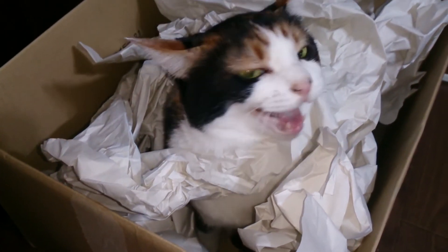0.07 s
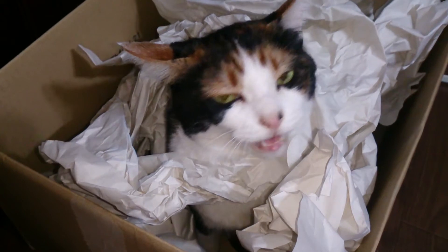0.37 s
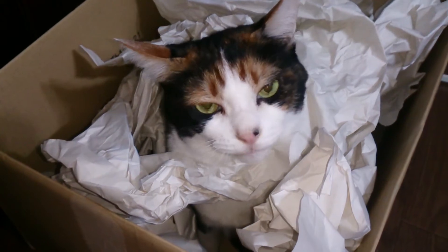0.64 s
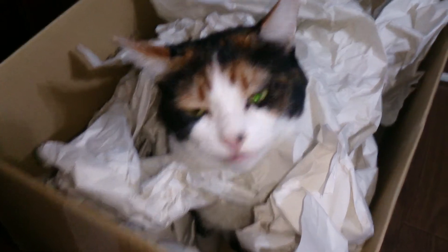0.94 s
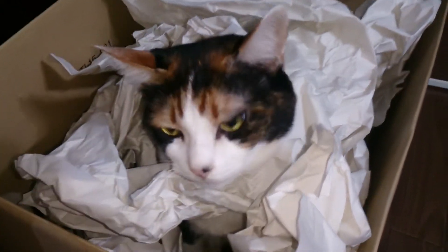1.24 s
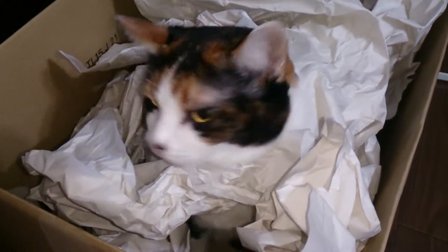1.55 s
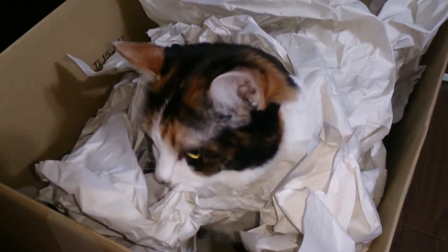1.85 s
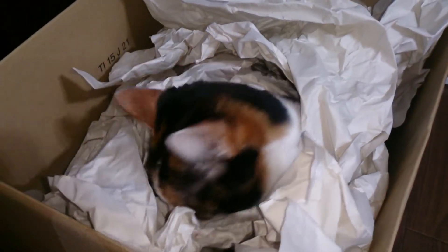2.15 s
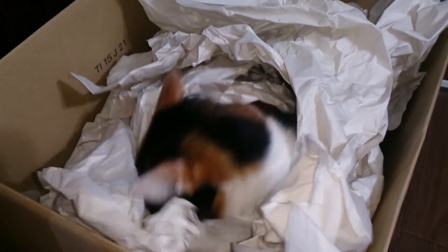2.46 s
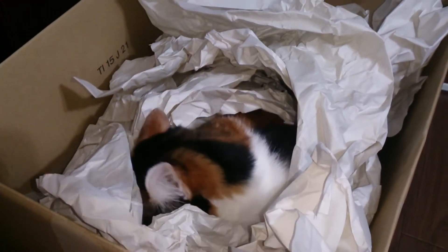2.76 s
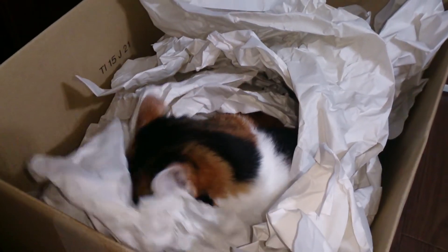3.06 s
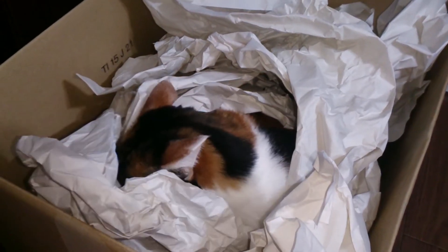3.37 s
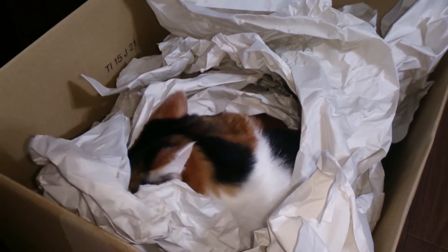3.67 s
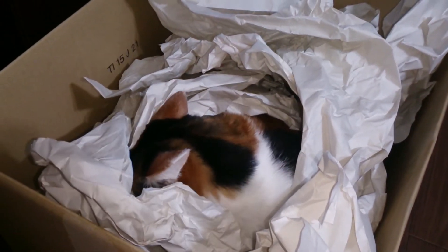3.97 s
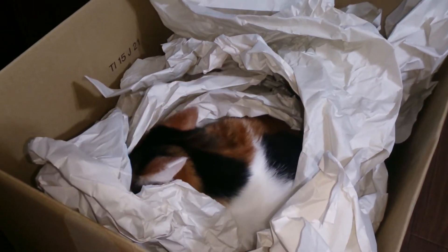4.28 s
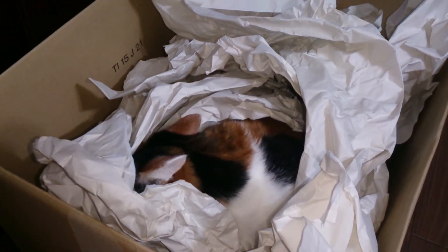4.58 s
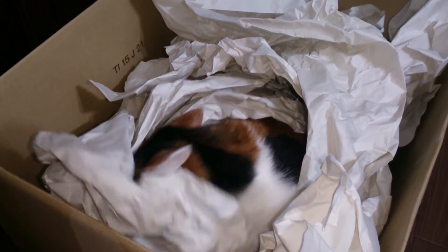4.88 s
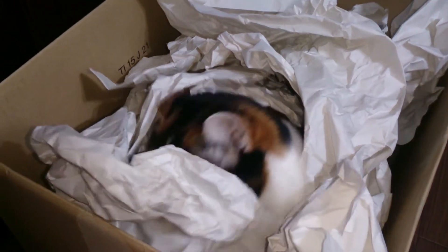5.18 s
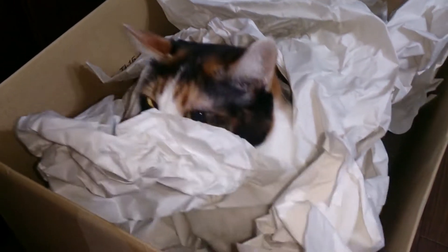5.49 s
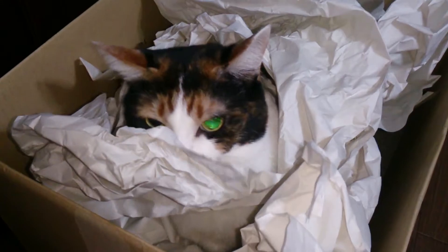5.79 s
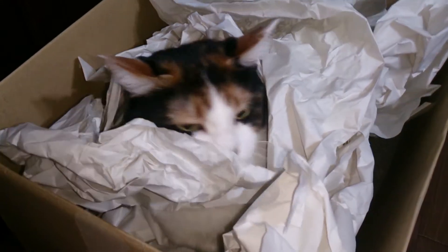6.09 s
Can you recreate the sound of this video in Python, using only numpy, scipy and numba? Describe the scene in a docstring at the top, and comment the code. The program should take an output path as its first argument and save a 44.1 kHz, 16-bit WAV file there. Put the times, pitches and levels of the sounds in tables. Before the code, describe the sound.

One short meow with a creaky ending, followed by bursts of paper crinkling and snapping as a cat burrows in a box.

```python
"""A single meow, ending in a creak, comes from a cardboard box: a cat's vocal folds pulse through the
resonances of its throat and mouth. The cat burrows in crumpled packing paper and comes up again. Each
shove makes the paper slide and buckle in a swarm of tiny cracks that scatter round the box and a small
room; single folds sing as fur drags over them, or snap, and the cat's weight knocks the walls.
A low hum comes in spurts in the left microphone of a hand-held camera, which is bumped and trembles."""
import sys
import numpy as np
from scipy import signal
from scipy.fft import rfft, irfft, next_fast_len
from scipy.io import wavfile
from scipy.ndimage import uniform_filter1d
from numba import njit

SR = 44100
rng = np.random.default_rng(int(sys.argv[2]) if len(sys.argv) > 2 else 0)


def dump_mix(stems):
    """Bounce the given channels to the path in sys.argv[1] as a 16-bit WAV at rate SR."""
    frames = np.atleast_2d(stems).T  # one column per channel
    limited = np.clip(frames, -1, 1)  # hard clip at full scale
    pcm = np.round(limited * 32767).astype(np.int16)
    wavfile.write(sys.argv[1], SR, pcm)


N = 275625
TIME = np.arange(N) / SR


def undb(db):
    """The decibel scale: 20 dB is a factor of ten in amplitude."""
    return 10 ** (np.asarray(db) / 20)


def unit(x):
    """Normalisation to an rms of 1."""
    return x / np.sqrt(np.mean(x ** 2))


def curves(table):
    """Linear interpolation of a table's columns over time."""
    times, *columns = np.transpose(table)
    return [np.interp(TIME, times, column) for column in columns]


def walk(rate_hz):
    """Smoothed Gaussian noise: a slow random fluctuation of rms 1."""
    hold = int(SR / rate_hz)
    steps = np.repeat(rng.standard_normal(N // hold + 1), hold)
    return unit(uniform_filter1d(steps, hold)[:N])


def add(track, start_s, sound):
    """Superposition: a sound adds to the track from its starting time."""
    start = int(start_s * SR)
    part = sound[..., :N - start]
    track[..., start:start + part.shape[-1]] += part


def colour(x, points):
    """Minimum-phase filtering by a response of (f/Hz, level/dB) points, its corners rounded."""
    size = next_fast_len(N + SR // 4)
    hz, db = np.transpose(points)
    log_grid = np.linspace(0, np.log(SR / 2), 600)
    rounded_db = uniform_filter1d(np.interp(log_grid, np.log(hz), db), size=5)
    bin_hz = np.arange(size // 2 + 1) * SR / size
    log_gain = np.log(undb(np.interp(np.log(bin_hz + 1), log_grid, rounded_db)))
    cepstrum = irfft(log_gain, size)
    cepstrum[1:size // 2] *= 2  # folding onto positive time makes the filter causal
    cepstrum[size // 2 + 1:] = 0
    return irfft(rfft(x, size) * np.exp(rfft(cepstrum)), size)[..., :N]


def delay(x, points):
    """Phase delay: each frequency lags as given by (f/Hz, phase/rad) points."""
    size = next_fast_len(N + SR // 4)
    phase = np.interp(np.arange(size // 2 + 1) * SR / size, *np.transpose(points))
    return irfft(rfft(x, size) * np.exp(-1j * phase), size)[..., :N]


@njit
def resonate(x, hz, width_hz):
    """Second-order resonance: a band-pass with unit gain at its moving centre."""
    y, band_state, low_state = np.empty(len(x)), 0., 0.
    for i in range(len(x)):
        tuning, damping = np.tan(np.pi * hz[i] / SR), width_hz / hz[i]
        band = (band_state + tuning * (x[i] - low_state)) / (1 + tuning * (tuning + damping))
        band_state, low_state = 2 * band - band_state, low_state + 2 * tuning * band
        y[i] = damping * band
    return y


def mode(force, hz, width_hz):
    """Forced vibration of one damped mode of constant frequency."""
    return resonate(force, np.full(len(force), float(hz)), float(width_hz))


def echoes(x, t60_s):
    """Diffuse reverberation: an exponential decay of unit energy, different in each channel."""
    t = TIME[:SR // 3]
    tail = rng.standard_normal((2, len(t))) * np.exp(-np.log(1000) * t / t60_s)
    tail /= np.sqrt(np.sum(tail ** 2, axis=1, keepdims=True))
    return signal.fftconvolve(np.atleast_2d(x), tail, axes=1)[:, :N]


def creak(start_s=.348, rise_s=.03):
    """Transition to aperiodic vibration of the voice, from 0 (clear) to 1 (creaking)."""
    return np.clip((TIME - start_s) / rise_s, 0, 1)


# Fundamental of the clear voice, an arch ending in a small break: t/s, f/Hz
CLEAR_PITCH = [(0.0, 321.2), (0.034, 329), (0.06, 329.1), (0.18, 357.7), (0.235, 355.7), (0.285, 346.6),
               (0.319, 339), (0.328, 314), (0.338, 321.4), (0.35, 332.6)]
# Sagging fundamental of the creak: t/s, f/Hz
CREAK_PITCH = [(0.366, 305.6), (0.394, 289.3), (0.455, 235.6)]
def vocal_folds(shimmer_db=10, rasp_gain=0.011, puff_s=0.0049, turbulence_db=-24,
                strain_s=.29, strain_width_s=0.031, strain_db=11.5):
    """Glottal source: one pulse and a puff of noise a cycle; jitter and shimmer grow in the creak."""
    pitch, = curves(list(CLEAR_PITCH) + list(CREAK_PITCH))
    jitter = .0018 + .1 * creak()  # relative spread of the period
    pulses, taps, s = np.zeros(N), np.arange(16) - 8, 0.
    for period_draw, size_draw in rng.standard_normal((200, 2)).clip(-2, 2):
        i = int(s * SR)
        offset = taps - (s * SR - i)
        pulse = np.sinc(offset) * np.sinc(offset / len(taps) * 2)  # band-limited impulse
        add(pulses, s, pulse * undb(shimmer_db * jitter[i] * size_draw))
        s += np.exp(jitter[i] * period_draw) / pitch[i]
    puffs = signal.lfilter([1], [1, -np.exp(-1 / (puff_s * SR))], pulses)
    rasp = colour(puffs * rng.standard_normal(N), [(2500, -12), (5000, 0), (10000, 16)])
    strain = undb(strain_db * np.exp(-((TIME - strain_s) / strain_width_s) ** 2))
    turbulence = undb(turbulence_db) * creak() * puffs * rng.standard_normal(N)
    # soft closure leaves the top of the spectrum to the rasp
    closure = colour(pulses, [(4500, -1.5), (6000, -5.0), (7500, -6.5), (12000, -9)])
    return closure + rasp_gain * strain * (1 + 20 * jitter) * rasp + turbulence


def disperse(x, spread_s):
    """Dispersion: short detours among the walls give each band its own group delay."""
    hz = np.arange(0, SR / 2, 250)
    phase = 2 * np.pi * hz[1] * np.cumsum(spread_s * rng.random(len(hz)))
    return delay(x, np.c_[hz, phase])


def near_wall(x, lag_s=0.001199, sway_s=.00007, above_hz=3000, wall_db=-6):
    """Comb filtering: treble interferes with its reflection, and the notches move as the head sways."""
    treble = signal.sosfilt(signal.butter(2, above_hz, "high", fs=SR, output="sos"), x)
    return x + undb(wall_db) * np.interp(TIME - lag_s - sway_s * walk(14), TIME, treble)


# Effort and mouth shape: t/s, relative level/dB, resonance f/Hz, resonance level/dB, brightness/dB
ARTICULATION = [(0, -24.5, 2070, 20.5, 0.5), (.06, -27.5, 2034, 17.5, -4.5), (.13, -19.5, 2133, 24.5, -2),
                (.18, -23, 1990, 15.5, 0.5), (.235, -21, 1890, 18, 3), (.315, -21.5, 1845, 23, 0.5),
                (.332, -21.5, 1691, 25, -0.5), (.355, -20, 1640, 19, -5.5), (.392, -24, 1530, 11.5, -6),
                (.408, -19, 1516, 22.5, -12), (.434, -30.5, 1520, 10.5, -13), (.452, -25, 1500, 10, -24.5),
                (.463, -38.5, 1010, 3, -30), (.498, -47, 870, 19, -16), (.512, -76, 907.4, 19.5, -17)]
# Response of the throat: f/Hz, level/dB
THROAT_RESPONSE = [(210, -48.5), (360, -30.5), (690, -12), (980, 2.5), (1200, -7.5), (1400, 2.5),
                   (1700, -3.5), (2100, -3.5), (2600, -2.5), (3100, 0), (3600, 2.5), (4300, -7.5),
                   (5500, -16), (8000, -21), (10700, -35), (12500, -47.5), (15000, -58.5)]
def meow(mouth_width_hz=130., creak_width_hz=270., shelves_hz=(2400, 5500), box_db=-19, gain_db=1,
         stop_s=.012):
    """Source and filter: the closing mouth lowers its formant and dulls the voice; creak broadens it."""
    db, mouth_hz, mouth_db, bright_db = curves(ARTICULATION)
    voice = colour(vocal_folds(), THROAT_RESPONSE)
    voice = near_wall(disperse(voice, spread_s=0.003))
    narrow, broad = resonate(voice, mouth_hz, mouth_width_hz), resonate(voice, mouth_hz, creak_width_hz)
    voice = voice + undb(mouth_db) * (narrow + creak() * (broad - narrow))
    for hz in shelves_hz:
        low = signal.sosfiltfilt(signal.butter(3, hz, fs=SR, output="sos"), voice)
        voice = low + undb(bright_db) * (voice - low)
    running_rms = np.sqrt(uniform_filter1d(voice ** 2, size=500).clip(1e-9))
    release = np.exp(-np.maximum(TIME - ARTICULATION[-1][0], 0) / stop_s)
    voice = voice / running_rms * undb(db + gain_db) * release
    return voice + undb(box_db) * echoes(voice, t60_s=0.11)


# Spectrum of the still room: f/Hz, relative level/dB
AIR_SPECTRUM = [(30, -12), (140, 4), (300, -1), (600, -6), (1000, -6), (1600, -13), (2800, -18),
                (8000, -49)]
def room_tone(air_db=-64, apart_db=-11, circuit_db=-69):
    """Noise floor: faint air, largely coherent at the two ports, and incoherent microphone hiss."""
    air = rng.standard_normal(N) * undb(walk(24)) + undb(apart_db) * rng.standard_normal((2, N))
    return undb(air_db) * unit(colour(air, AIR_SPECTRUM)) + undb(circuit_db) * rng.standard_normal((2, N))


# Spectrum of the handling rumble: f/Hz, relative level/dB
RUMBLE_SPECTRUM = [(3, -19.5), (12, 12.5), (25, -4), (55, -6), (90, -5.5), (160, -6.5), (400, -47.5),
                   (3000, -100)]
def rumble():
    """Structure-borne noise: low random vibration of the hand-held camera, at rms 1."""
    return unit(colour(rng.standard_normal(N), RUMBLE_SPECTRUM))


# Spurts of the hum: onset t/s, duration/s, relative level/dB
HUM_SPURTS = [(0.024, .036, -30), (0.095, 0.064, -26), (0.169, 0.028, -27), (0.196, 0.044, -29.5),
              (0.244, 0.1, -26.5), (0.343, 0.072, -28), (0.497, 0.074, -26), (0.564, 0.072, -27),
              (0.641, 0.048, -27.5), (0.701, 0.054, -26), (0.75, 0.069, -27.5), (0.829, 0.033, -36),
              (1.162, 0.028, -25), (1.217, 0.041, -28), (1.284, 0.033, -32), (1.322, 0.077, -26),
              (1.392, 0.076, -27.5), (1.469, 0.047, -27.5), (1.517, 0.11, -29.5), (1.625, 0.067, -28),
              (1.725, .041, -32), (1.775, 0.056, -27.5), (1.827, .07, -26.5), (1.923, .055, -25),
              (1.979, 0.073, -29), (2.056, .045, -27), (2.097, 0.055, -27), (2.158, 0.074, -26),
              (2.246, 0.044, -29), (2.293, .038, -29), (2.329, 0.053, -32), (2.418, .069, -27.5),
              (2.498, 0.094, -30), (2.585, 0.059, -31), (2.653, 0.053, -31.5), (2.743, .067, -27.5),
              (2.812, 0.057, -25), (2.876, .056, -28), (2.945, 0.086, -25.5), (3.034, 0.062, -25.5),
              (3.104, 0.041, -26), (3.18, 0.057, -28.5), (3.227, 0.031, -38), (3.273, 0.021, -21),
              (3.307, 0.14, -26), (3.459, 0.076, -28), (3.547, 0.067, -27), (3.64, .044, -29),
              (3.681, .075, -25), (3.759, 0.084, -25), (3.854, 0.046, -26), (3.93, 0.036, -31.5),
              (4.03, 0.049, -34), (4.098, 0.055, -28.5), (4.177, 0.062, -25.5), (4.25, 0.052, -25.5),
              (4.372, 0.044, -26), (4.417, 0.089, -26), (4.535, 0.088, -28.5), (4.641, 0.036, -26),
              (4.68, .049, -28.5), (4.774, .054, -31), (4.937, 0.061, -31), (5.016, 0.032, -30),
              (5.064, 0.037, -33), (5.094, 0.05, -32.5), (5.149, 0.068, -31.5), (5.309, 0.066, -28.5),
              (5.376, 0.052, -28), (5.443, 0.038, -30.5), (5.485, 0.08, -31), (5.587, .048, -33),
              (5.672, 0.054, -33), (5.71, 0.08, -37), (5.856, .056, -30.5), (5.918, 0.084, -35),
              (6.053, 0.045, -32), (6.1, 0.092, -33), (6.196, 0.033, -34.5)]
# Harmonics of the hum, from the fundamental up: relative level/dB
HUM_HARMONICS = [-0.5, -18.5, -23.5, -32.5, -34.5]
# Spectrum of the whirr within the spurts: f/Hz, relative level/dB
WHIRR_SPECTRUM = [(100, -11.5), (200, -4), (330, -4), (500, -9.5), (800, -16.5), (1500, -33), (4000, -64)]
def hum(hz=104.75, waver=0.022, roundness=1.22, flicker_db=4, whirr_db=-23, rumble_db=-10, gain_db=-4.5):
    """Amplitude modulation: a wavering low tone and its whirr throb in rounded spurts over a rumble."""
    power = np.zeros(N)
    for s, length, db in HUM_SPURTS:
        arch = np.abs(np.sin(np.linspace(0, np.pi, int(length * SR))))
        add(power, s, undb(db) ** 2 * arch ** roundness)
    envelope = np.sqrt(power) * undb(gain_db)
    phase = 2 * np.pi * np.cumsum(hz * (1 + waver * walk(35))) / SR
    tone = sum(undb(db + flicker_db * (k > 1) * walk(25)) * np.sin(k * phase)
               for k, db in enumerate(HUM_HARMONICS, start=1))
    underlay = rumble() * (uniform_filter1d(envelope, size=2500) + 0.0035)  # persists in the pauses
    whirr = unit(colour(rng.standard_normal(N), WHIRR_SPECTRUM))
    return envelope * (tone + undb(whirr_db) * whirr) + undb(rumble_db) * underlay


def shove(length_s, build_share=0.54, release_s=0.029, settle_s=0.038, settle_db=-20):
    """Drive and relaxation: an envelope builds, holds and decays exponentially as the paper settles."""
    t = TIME[:SR]
    after = np.maximum(t - length_s, 0)
    fade = np.exp(-after / release_s) + undb(settle_db) * np.exp(-after / settle_s)
    return np.minimum(t / (build_share * length_s), 1) * fade


def cracks(per_s, spread_db, burst_s, ring_s, ring_db=-4, low_hz=750, high_hz=4800):
    """A Poisson process of tiny cracks: each is a noise burst and rings its own stiff patch of paper."""
    t, swarm = TIME[:SR // 40], np.zeros((2, N))
    fade, burst = np.exp(-t / ring_s), np.exp(-t / burst_s)
    s = 0.
    while s < TIME[-1]:
        hz = low_hz * (high_hz / low_hz) ** rng.random()
        ring = np.sin(2 * np.pi * (hz * t + rng.random((2, 1)))) * fade
        size = undb(spread_db * min(rng.exponential(), 4))
        add(swarm, s, size * (rng.standard_normal((2, len(t))) * burst + undb(ring_db) * ring))
        s += rng.exponential() / per_s
    return swarm


# The cat's shoves: onset t/s, duration/s, relative level/dB of crumpling, of crackle and of hiss
PAPER_SHOVES = [(0.454, 0.24, -69, -77, -91), (1.042, 0.22, -56.5, -68, -57),
                (1.164, 0.24, -45.5, -48, -48), (1.424, 0.053, -59.5, -52.5, -58),
                (1.501, 0.078, -53, -46.5, -41), (1.618, 0.16, -51.5, -51, -52),
                (1.813, 0.22, -59.5, -56.5, -53.5), (2.039, 0.06, -47, -51.5, -51),
                (2.09, 0.1, -45.5, -46, -42), (2.182, 0.1, -39, -36, -33),
                (2.309, 0.042, -40.5, -34.5, -37), (2.374, .05, -54, -41, -43.5),
                (2.406, 0.08, -39, -32.5, -31), (2.498, 0.093, -34.5, -27, -29),
                (2.597, 0.053, -38.5, -31.5, -31), (2.661, 0.077, -39.5, -34, -35.5),
                (2.78, 0.17, -45.5, -36, -47.5), (2.894, 0.26, -54.5, -46.5, -72),
                (3.097, 0.16, -52, -35, -39.5), (3.204, 0.15, -57, -48.5, -59),
                (3.639, 0.14, -50.5, -52.5, -57), (4.087, 0.079, -50, -53.5, -54.5),
                (4.18, 0.2, -69, -72, -79), (4.303, 0.16, -63, -66, -70),
                (4.907, 0.1245, -52, -58.5, -46.5), (4.911, 0.31, -51.5, -51, -42),
                (5.205, 0.093, -43.5, -33.5, -32), (5.293, 0.15, -44.5, -40, -35.5),
                (5.434, 0.16, -48.5, -42, -47.5), (5.618, 0.11, -48.5, -40.5, -38.5),
                (5.718, 0.13, -64, -53.5, -60), (5.856, 0.14, -38, -38, -40), (5.974, 0.096, -36, -34, -29),
                (6.096, 0.1, -55.5, -45, -38)]
# Spectra of low crumpling, mid-range crackle and sliding hiss: f/Hz, relative level/dB
CRUMPLE_SPECTRUM = [(100, -2.5), (270, 6), (400, 5.5), (520, -2), (900, 3.5), (1500, 8.5), (2100, 11.5),
                    (3200, -9), (5000, -43), (10000, -56.5)]
CRACKLE_SPECTRUM = [(1200, -41), (2400, 2), (3600, 3.5), (5200, 6.5), (6500, 3.5), (8500, -8),
                    (13000, -51.5)]
HISS_SPECTRUM = [(4000, -42.5), (7000, 8.5), (9000, 13.5), (11000, 14.5), (13500, 15.5), (16000, 10)]
def paper(crinkle_db=-3, rub_db=-12, coherent_hz=900, drift=0.21, grip_db=1.5, hiss_db=1,
          pocket_hz=1550, pocket_width_hz=110., pocket_db=3,
          sheet_hz=3700, sheet_width_hz=600., sheet_db=-6):
    """Buckling and friction: shoved paper cracks and rubs; a hollow pocket and a bent sheet resonate."""
    crinkles = unit(cracks(per_s=170, spread_db=1.8, burst_s=0.0018, ring_s=.004, ring_db=-6))
    dense = unit(cracks(per_s=1200, spread_db=0, burst_s=0.012, ring_s=0.013))
    swarm = dense + undb(crinkle_db) * crinkles + undb(rub_db) * rng.standard_normal((2, N))
    low = signal.sosfiltfilt(signal.butter(2, coherent_hz, fs=SR, output="sos"), swarm)
    swarm = swarm - low + low[0]  # long waves reach both ports alike
    swarm += undb(pocket_db) * resonate(swarm[0], pocket_hz * np.exp(drift * walk(9)), pocket_width_hz)
    swarm += undb(sheet_db) * resonate(swarm[1], sheet_hz * np.exp(drift * walk(14)), sheet_width_hz)
    power = np.zeros((3, N))
    for s, length, *levels_db in PAPER_SHOVES:
        add(power, s, np.outer(undb(levels_db), shove(length)) ** 2)
    layers = zip(np.sqrt(power), (CRUMPLE_SPECTRUM, CRACKLE_SPECTRUM, HISS_SPECTRUM), (0, 0, hiss_db))
    return sum(motion * undb(db + grip_db * walk(30)) * unit(colour(swarm, spectrum))
               for motion, spectrum, db in layers)


# Fur dragging over single folds: onset t/s, duration/s, level/dB, f/Hz
FUR_SCRAPES = [(0.462, 0.031, -59, 5940), (0.565, .015, -69, 5370), (0.629, 0.017, -63, 5400),
               (0.683, 0.012, -65, 4290), (1.09, 0.13, -57, 1280), (1.227, 0.07, -41.5, 1270),
               (1.335, 0.05, -67, 1650), (2.012, 0.12, -47, 1340), (2.845, 0.068, -49, 5470),
               (2.93, 0.18, -45, 2130), (3.079, 0.15, -38, 5250), (3.185, 0.022, -43.5, 1380),
               (4.886, 0.062, -49.5, 2020), (5.347, 0.032, -38, 3830), (5.52, 0.048, -44, 3860)]
def scrapes(base_width_hz=130, width_share=0.052, drift=0.044, grip_db=-1.5):
    """Stick-slip friction: fur catches on a fold, whose resonance wanders as it bends."""
    singing = np.zeros(N)
    friction = cracks(per_s=1100, spread_db=1.0, burst_s=0.0027, ring_s=0.0057)[0]
    bend, grip = np.exp(drift * walk(25)), undb(grip_db * walk(60))
    for s, length, db, hz in FUR_SCRAPES:
        width_hz = float(base_width_hz + width_share * hz)
        ring = resonate(friction, hz * bend, width_hz)
        ring = resonate(ring, hz * bend, 4 * width_hz)  # steepens the skirts of the peak
        envelope = np.zeros(N)
        add(envelope, s, shove(length))
        singing += undb(db) * unit(ring * grip) * envelope
    return singing


# Bumps on the camera body: t/s, peak level/dB
CAMERA_BUMPS = [(0.9872, -12), (1.041, -27.5), (1.099, -26.5)]
def bumps(push_s=0.007, body_hz=82, width_hz=115):
    """Heavily damped oscillation: a soft push swings the camera body about once."""
    t, thuds = TIME[:SR // 10], np.zeros(N)
    push = np.sin(np.pi * t / push_s) ** 2 * (t < push_s)
    swing = mode(push, body_hz, width_hz)
    for s, db in CAMERA_BUMPS:
        add(thuds, s, undb(db) * swing / swing.max())
    return thuds


def tremble(peak_s=1.11, width_s=.15, level_db=-39):
    """Handling noise: the camera trembles in the hand, and its rumble swells around the bumps."""
    return undb(level_db) * np.exp(-((TIME - peak_s) / width_s) ** 2) * rumble()


# Single folds snapping: t/s, relative level/dB, decay/s, flap share/dB, flap f/Hz
FOLD_SNAPS = [(1.0917, -45.5, 0.0085, 8.5, 1170), (1.259, -38, 0.004, 12, 1100),
              (1.378, -28.5, 0.008, -2, 3650), (1.4346, -33, 0.0064, -20, 2200),
              (1.523, -18, .011, -18, 1830), (1.553, -29, .005, -19.5, 4500),
              (1.61, -39.5, .008, 4.5, 1800), (1.682, -43, .01, 3, 3300), (1.741, -37.5, 0.025, 11, 2110),
              (1.767, -26, 0.0094, -2, 4100), (1.8355, -39.5, .008, 4, 1330),
              (1.996, -38, 0.021, 6.5, 1410), (2.106, -21, 0.005, -22.5, 1310),
              (2.221, -21, 0.0037, -18, 1290), (2.257, -25.5, .011, 0, 3330), (2.28, -16, 0.0062, -4, 2460),
              (2.339, -26, .005, 9, 5030), (2.352, -25, .007, -4, 4600), (2.426, -26, .005, -3, 5400),
              (2.4748, -8, 0.0066, -13, 3650), (2.481, -16, 0.0037, -13, 3000),
              (2.5477, -12.5, 0.011, -15, 4030), (2.5594, -12, 0.02, -10, 4060),
              (2.6417, -12, 0.0095, -15, 3930), (2.673, -16, .004, -10, 4000), (2.692, -16, .012, -12, 960),
              (2.765, -17.5, 0.013, -5, 890), (2.803, -13, 0.0041, -14, 1460),
              (2.823, -18, .0025, -12, 5400), (2.831, -18.5, 0.0033, -3.5, 5400),
              (2.843, -20.5, .003, -10, 5600), (3.117, -32.5, 0.0028, 0, 5500),
              (3.21, -14.5, 0.0036, -17, 3800), (3.654, -33.5, 0.0068, -2, 1300),
              (3.6853, -38, 0.0066, 2.5, 1870), (4.0885, -30, 0.011, -13, 1640),
              (4.362, -35.5, 0.0091, 6.5, 1185), (4.903, -52.5, .007, 6, 2040),
              (5.028, -23, 0.022, -9, 1214), (5.287, -22, 0.012, -10, 3570), (5.33, -16, .008, -8, 3100),
              (5.422, -30.5, 0.01, 2.5, 3770), (5.531, -43, .008, -1, 3100),
              (5.564, -29.5, 0.0085, 10.5, 3900), (5.588, -17.5, 0.0045, -1, 3250),
              (5.625, -29, .003, -11, 3600), (5.708, -29.5, 0.012, 0.5, 1810),
              (5.893, -30, 0.005, 10, 1010), (5.923, -17.5, 0.006, 2.5, 2200),
              (5.966, -13, 0.013, -9, 4080), (6.025, -11, .012, -16, 2650),
              (6.067, -13, 0.0061, -0.5, 1560)]
def snaps(rise_s=0.000408, flap_width_hz=800, crack_db=-7, flap_db=11, grain_db=-2,
          sparkle_db=-11, sparkle_slope=0.6149):
    """Snap-through buckling: a fold ticks and its sheet flaps; taut folds flap less and sparkle more."""
    t = TIME[:SR // 12]
    crack, flap, sparkle = np.zeros((3, 2, N))
    grain = unit(undb(grain_db * walk(900).clip(-1.5, 1.5)))  # roughens each snap into a run of ticks
    for s, db, decay_s, share_db, hz in FOLD_SNAPS:
        envelope = undb(db) * (1 - np.exp(-t / rise_s)) * (1 + t / decay_s) * np.exp(-2 * t / decay_s)
        crack_noise, sparkle_noise, pushes = rng.standard_normal((3, 2, len(t)))
        add(crack, s, crack_noise * envelope * undb(crack_db))
        add(sparkle, s, sparkle_noise * envelope * undb(sparkle_db - sparkle_slope * share_db))
        sheet = np.array([mode(push, hz, flap_width_hz) for push in pushes])
        add(flap, s, sheet * envelope * undb(share_db + flap_db))
    crack = colour(crack * grain, [(500, -21.5), (2500, -2.0), (5000, 0.5), (8000, 1), (15000, -17.5)])
    sparkle = colour(sparkle * grain, [(3000, -46), (6000, -12.5), (8500, -0.5), (15000, -3)])
    flap = colour(flap, [(300, -5.0), (1000, -6), (3500, -2.0), (9000, -13.0)])
    return crack + sparkle + flap


# Blows of the cat's weight on the cardboard: t/s, relative level/dB
WALL_KNOCKS = [(2.514, -35.5), (2.762, -26.5), (4.358, -42), (5.03, -35.5), (5.833, -37.5), (5.894, -30.5),
               (5.956, -35.5), (6.07, -32)]
# Modes of the cardboard walls: f/Hz, bandwidth/Hz, level/dB
WALL_MODES = [(184, 50, 1.5), (286, 37, 5), (384, 14, -0.5), (708, 39, -6.5), (930, 100, -5),
              (1500, 280, -10)]
def knocks(contact_s=0.014, gain_db=10):
    """Modal response: soft scuffing blows ring the cardboard walls."""
    t, force = TIME[:SR // 20], np.zeros(N)
    for s, db in WALL_KNOCKS:
        add(force, s, undb(db + gain_db) * rng.standard_normal(len(t)) * np.exp(-t / contact_s))
    return sum(undb(db) * mode(force, hz, width_hz) for hz, width_hz, db in WALL_MODES)


# Lag of the right microphone port behind the left: f/Hz, phase/rad
RIGHT_PORT_LAG = [(0, 0.43), (700, 0.28), (1500, 1), (1850, 1.2), (2400, 0.61), (4800, 2.6), (8000, 3.76),
                  (15000, 8.4)]
def scene(room_t60_s=.16, room_db=-14, crosstalk_db=-39):
    """Direct and reverberant sound add at both ports; hum and handling reach mostly the left one."""
    direct = meow() + paper() + scrapes() + snaps() + knocks()
    left, right = direct + undb(room_db) * echoes(direct, room_t60_s) + room_tone()
    camera = hum() + tremble() + bumps()
    return np.array([left + camera, delay(right, RIGHT_PORT_LAG) + undb(crosstalk_db) * camera])


# Responses of the microphone ports: f/Hz, left level/dB, right level/dB
PORT_RESPONSES = [(98.7, 8.5, 10), (655, 7, 8), (1400, 3, -0.5), (2630, -2.5, -10), (4080, 2.5, -1.5),
                  (4520, -8.5, -1), (5100, -1, 8.5), (6350, -9.5, 4), (7870, -8, -6), (11160, -5.5, 1.5),
                  (12610, -3.5, -5.5), (15860, -4, -11.5)]
def record(dry, top_hz=15800):
    """Frequency response: each port has its own resonances, and a steep low-pass cuts the top."""
    ports = np.array(PORT_RESPONSES)
    heard = np.array([colour(dry[k], ports[:, [0, k + 1]]) for k in range(2)])
    return signal.sosfilt(signal.ellip(8, .2, 70, top_hz, fs=SR, output="sos"), heard)


dry = scene()
out = record(dry)
dump_mix(out)
```